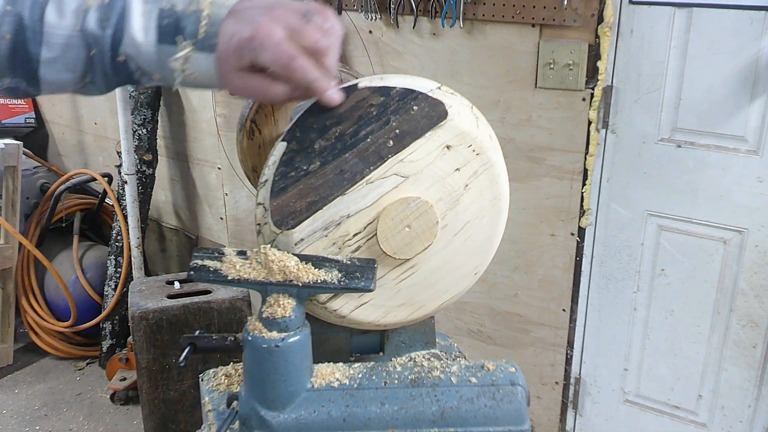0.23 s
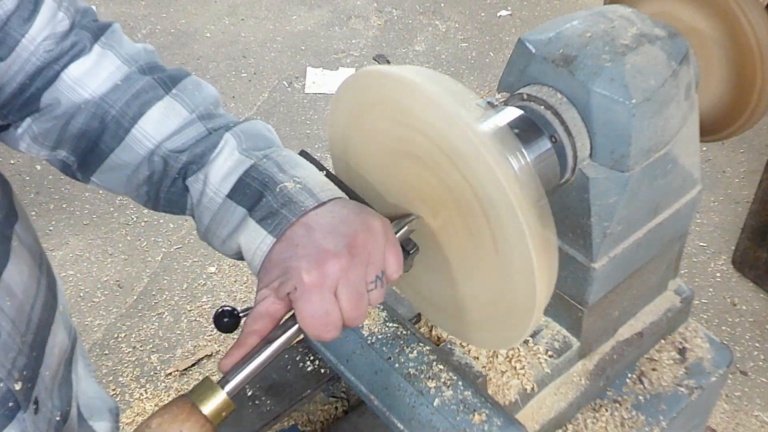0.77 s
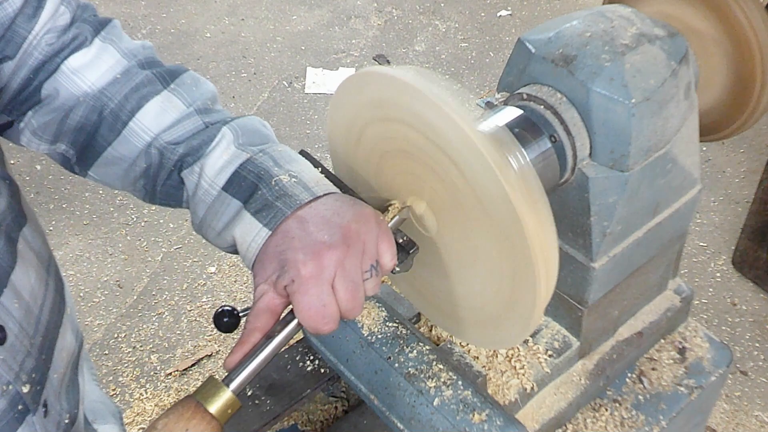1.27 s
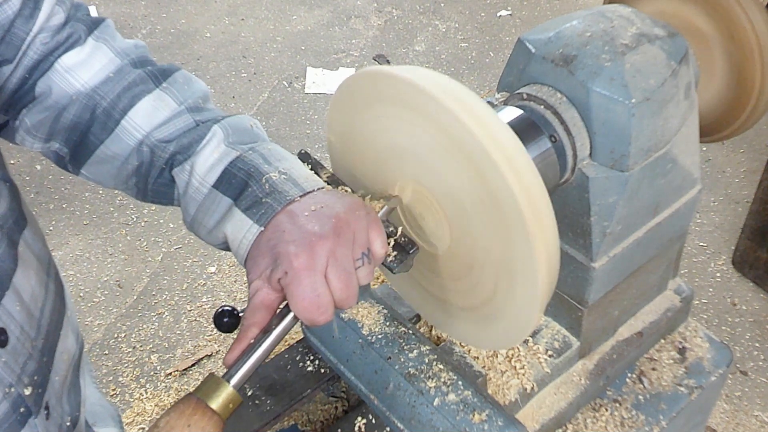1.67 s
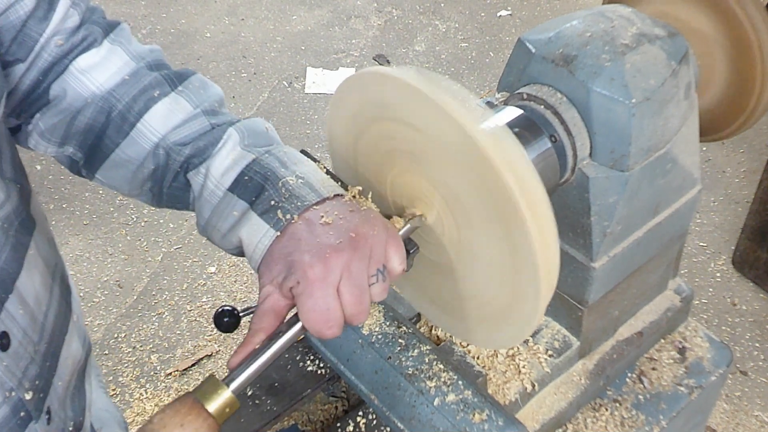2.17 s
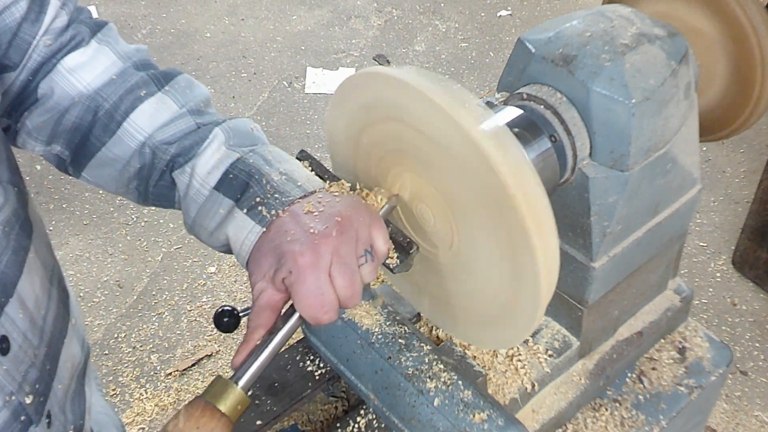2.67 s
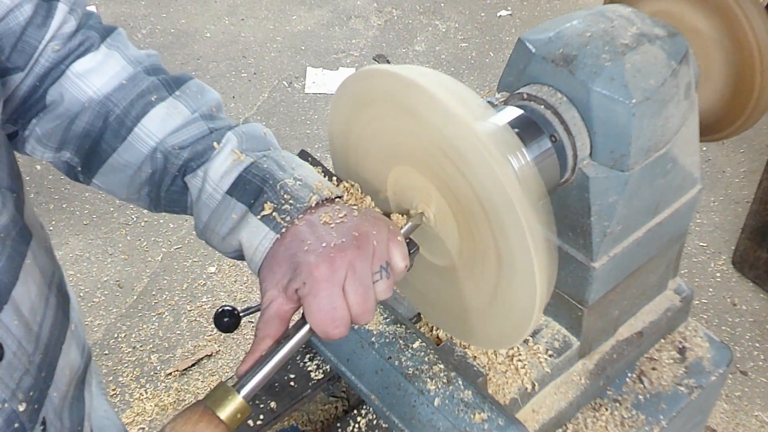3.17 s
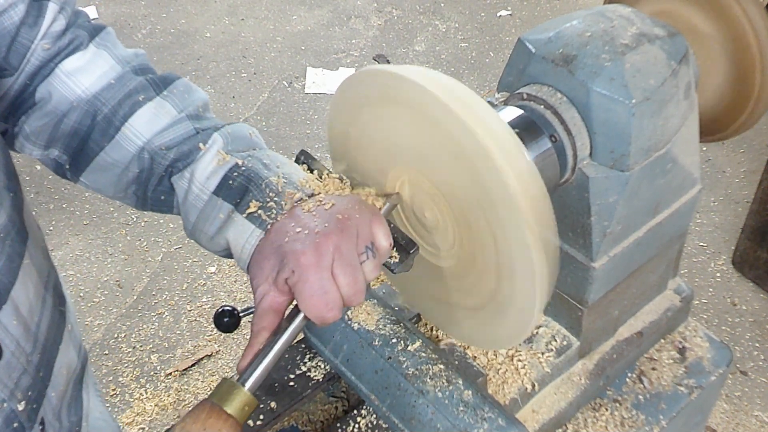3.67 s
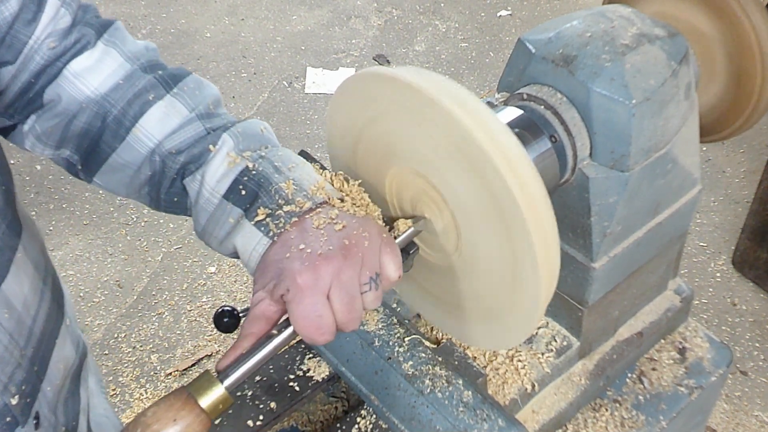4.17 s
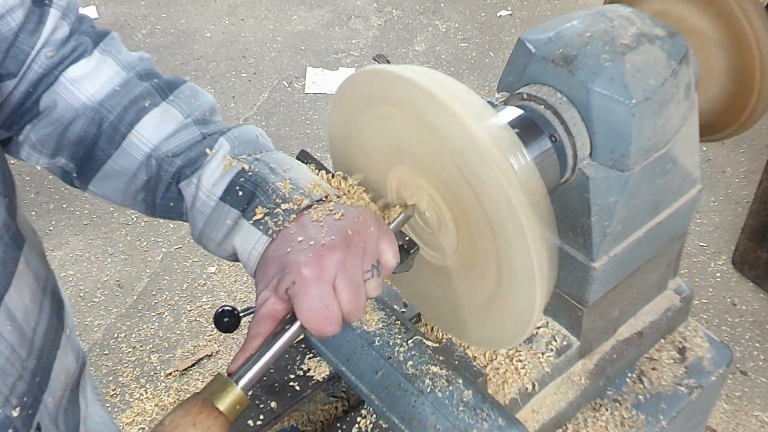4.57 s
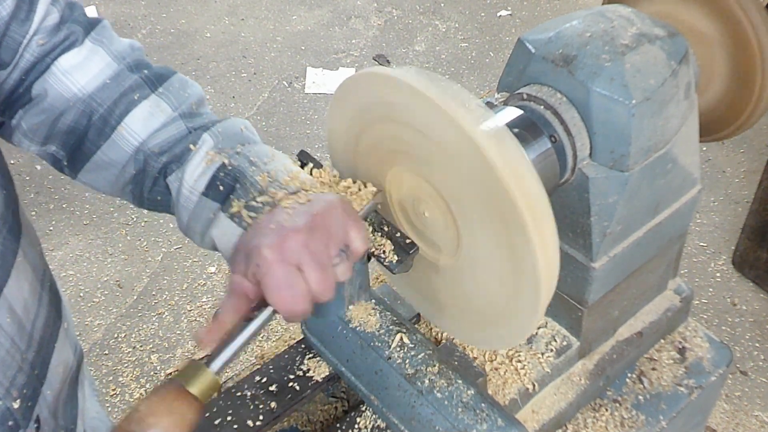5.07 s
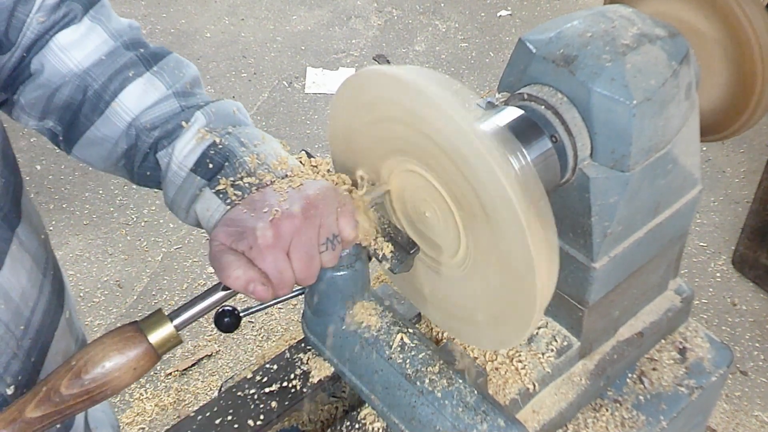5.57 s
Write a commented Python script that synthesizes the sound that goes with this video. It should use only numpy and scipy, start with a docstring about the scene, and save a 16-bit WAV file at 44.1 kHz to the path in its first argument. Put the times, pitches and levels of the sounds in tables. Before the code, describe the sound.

Faint room tone and a sleeve rustle, then a running lathe drones while a cutting tool growls, squeals and chatters against wood in bursts.

```python
"""A wood lathe at speed in a workshop: a gouge makes five passes over the face of the spinning blank,
the last opening with two brief touches. Fibres snap at random, shaking the blank and ringing the tool;
drones, knocks and scrapes join in. Filtered noise rumbles for the drive, wavering sines hum for the motor,
and close walls smear the treble. Ahead of it, cut off abruptly: the quiet shop, with room tone,
a rustling sleeve, a hand nudging the still blank and a thin whistle far down the room."""
import sys
import numpy as np
from scipy import signal
from scipy.fft import rfft, irfft
from scipy.io import wavfile
from scipy.ndimage import uniform_filter1d

SR = 44100
rng = np.random.default_rng(int(sys.argv[2]) if len(sys.argv) > 2 else 0)


def wav_out(sig):
    """Save sig, one row per channel (or a flat mono array), as 16-bit PCM at SR to the path in sys.argv[1]."""
    wavfile.write(sys.argv[1], SR, np.round(np.clip(np.atleast_2d(sig).T, -1, 1) * 32767).astype(np.int16))


N = 256220
TIME = np.arange(N) / SR  # s
LATHE_FROM_S = 0.6603
SPINDLE_HZ = 15.6

# Every spectrum below: (frequency [Hz], relative level per hertz [dB]).
# Every set of modes, the resonances on top: (centre [Hz], width [Hz], lift [dB]).
# resonances of the gouge: (centre [Hz], width [Hz], lift [dB])
TOOL_MODES = [(836, 100, 5), (876.4, 40, 5.3), (953, 44, 10.9)]
# resonances of the juddering edge: (centre [Hz], width [Hz], lift [dB])
JUDDER_MODES = [(1205, 60, 3.7), (1378, 41, 4.8), (1616, 160, 9.1), (1797, 52, 4.9)]


def amp(db):
    """Decibels to gain."""
    return np.exp(np.asarray(db) * np.log(10) / 20)


def unit(x):
    """Scales to rms 1."""
    return x / np.sqrt(np.mean(x ** 2) + 1e-20)


def sine(turns):
    """A sine of rms 1 from its running count of turns."""
    return unit(np.sin(2 * np.pi * turns))


def wander(hz):
    """Slow chance of rms 1, fading out above about hz."""
    coarse_time = np.linspace(0, TIME[-1], 4096)
    f = np.fft.rfftfreq(len(coarse_time), coarse_time[1])
    spectrum = rfft(rng.standard_normal(len(coarse_time)))
    slow = irfft(spectrum * np.exp(-(f / hz) ** 2))
    return np.interp(TIME, coarse_time, unit(slow))


def bump(s, length):
    """A smooth swell of height 1 around time s."""
    swell = np.zeros(N)
    near = slice(*np.searchsorted(TIME, [s - 2 * length, s + 2 * length]))
    swell[near] = np.exp(-2 * ((TIME[near] - s) / length) ** 2)
    return swell


def swells(rows):
    """Adds up the swells of rows (time [s], length [s], level [dB]) as gains."""
    return sum(amp(db) * bump(s, length) for s, length, db in rows)


def swells_db(rows):
    """Adds up the swells of rows (time [s], length [s], change [dB]) in decibels."""
    return sum(db * bump(s, length) for s, length, db in rows)


def body(x, spectrum, modes=(), size=8192):
    """Rings x through a causal filter of unit energy: a broad spectrum with resonances on top."""
    hz = abs(np.fft.fftfreq(size, 1 / SR))
    f, db = np.transpose(spectrum)
    db = np.interp(np.log(hz + 1), np.log(f), db)
    for centre, width, lift in modes:
        db = db + lift / (1 + (2 * (hz - centre) / width) ** 2)
    # minimum phase: the ring starts at once
    response = np.exp(np.conj(signal.hilbert(np.log(amp(db)))))
    ring = np.fft.ifft(response).real[:size // 2]
    return signal.oaconvolve(x, ring / np.linalg.norm(ring))[:N]


def snaps(per_s, spread_db):
    """Clicks of rms 1 at random times, as of breaking fibres: many small ones and a few large."""
    sizes = amp(spread_db * rng.standard_exponential(N))
    signs = np.sign(rng.random(N) - .5)
    breaks = rng.random(N) < per_s / SR
    return unit(sizes * signs * breaks)


def drone(hz, width_hz, db, waver_db=2.5):
    """A self-sustained vibration: nearly even in strength, its phase drifting at random."""
    drift = np.sqrt(2 * np.pi * width_hz / SR) * np.cumsum(rng.standard_normal(N))
    drift = uniform_filter1d(drift, size=600)
    turns = np.cumsum(hz * np.ones(N)) / SR
    return amp(db + waver_db * wander(25)) * sine(turns + drift / (2 * np.pi))


def gouge(tool_db=-3.0, scrape_db=-10.5, steel_db=-17.0, hiss_db=0.5, grain_db=1.5, uneven_db=1.1,
          bite=0.62, usual_tear_db=-21, regrip_scrape_db=2, regrip_steel_db=-9, bark_db=-5,
          catch_damping=0.87, steel_share=0.43):
    """Snapping fibres shake the blank, ring the tool, scrape and hiss."""
    # the edge digs in: (time [s], length [s], extra force [dB], then re force: judder [dB], tearing [dB])
    catches = [(1.48, 0.058, 4, 2, 0), (1.561, 0.02, 3.5, 4.5, 0), (1.606, 0.013, 1.5, 3, 0),
               (1.732, 0.011, 4.5, 6, 1), (1.803, 0.15, 3.5, -1.5, -0.5), (1.891, 0.016, 4, 7.5, 1),
               (2.63, 0.028, -1.5, 3.5, 1), (2.775, 0.035, 3.5, 0.5, 0), (3.333, 0.064, 2.5, 1.5, -1.5),
               (3.583, 0.069, 2.5, -1, -1.5), (4.58, 0.016, 2, 1.5, 1.5), (4.764, .025, 0.5, 0.5, 4),
               (4.87, 0.051, 2, -3, -3.5), (5.009, 0.011, 5, 3.5, -3), (5.37, 0.018, 1.5, -0.5, 8),
               (5.42, 0.014, 4.5, 6, 2), (5.551, 0.014, 7, 2, -1), (5.63, 0.018, 5, 5, 0),
               (5.698, 0.046, 3.5, 0, -4.5)]
    # the force of the cut changes for a moment: (time [s], length [s], change of force [dB])
    easings = [(1.695, 0.023, 0.5), (1.866, 0.0065, -2), (2.4, 0.013, -6.5), (2.574, 0.11, -2.5),
               (3.27, .016, 2), (3.42, 0.027, -1.5), (4.631, 0.0096, -1), (4.738, 0.0049, -4),
               (4.921, 0.042, -4), (5.472, 0.074, -4), (5.664, 0.0095, -0.5)]
    # the blank booms under the edge: (time [s], length [s], extra level of its lowest mode [dB])
    booms = [(1.083, 0.04, 12), (1.463, .03, 8), (1.733, 0.023, 10), (1.818, 0.028, 10), (2.21, 0.029, 13),
             (2.33, .03, 6), (3.156, 0.05, 15), (3.37, 0.035, 6), (4.485, 0.022, 1), (4.87, 0.038, 3),
             (5.55, .025, 5), (5.768, 0.028, 9.5)]
    # the blank's lowest mode, held in vibration: (frequency [Hz], line width [Hz], level re force [dB])
    blank_drone = (180.5, 16.7, -9.5)
    # the wooden blank: (frequency [Hz], level [dB]); (centre [Hz], width [Hz], lift [dB])
    blank_spectrum = [(30, -25), (85, -26), (125, -24), (165, 2), (300, -11), (520, -6.5), (700, -4),
                      (900, -6.5), (1200, -24), (2200, -53)]
    blank_modes = [(186, 52, 4.5), (264.3, 8.1, 7.7), (364, 65, 9.5), (447.3, 40, 9.2), (651, 23, 4),
                   (741, 32, 10.1)]
    # the ringing tool: (frequency [Hz], level [dB])
    tool_spectrum = [(300, -58.5), (650, -30), (800, -2.5), (950, -4.5), (1100, -20.5), (1500, -29),
                     (3000, -74)]
    # the juddering edge: (frequency [Hz], level [dB])
    judder_spectrum = [(300, -25.5), (800, -7.5), (1080, 3), (1300, 0.5), (1500, -9.5), (1800, -9.5),
                       (2000, -15), (2400, -20.5), (5000, -61)]
    # the higher bark of the edge with the handle swung out: (frequency [Hz], level [dB])
    bark_spectrum = [(1200, -25), (1560, -2), (1690, 6.5), (1830, -9), (1980, -13), (2600, -43)]
    # the scrape: (frequency [Hz], level [dB]); (centre [Hz], width [Hz], lift [dB])
    scrape_spectrum = [(1200, -19.5), (2150, -8), (2600, 5.5), (2950, 7.5), (3150, 3.5), (3500, -6.5),
                       (3950, -8), (4200, -21.5), (5300, -34.5), (9000, -66.5)]
    scrape_modes = [(2700, 50, 3), (3070, 95, 0.9), (3860, 170, 5.2)]
    # the singing steel: (frequency [Hz], level [dB]); (centre [Hz], width [Hz], lift [dB])
    steel_spectrum = [(2000, -44.5), (3100, -10), (3300, 3), (3480, 1.5), (3600, -22), (3740, -10),
                      (4200, -25.5), (7000, -42)]
    steel_modes = [(3357, 43, 11), (3456, 58, 8.4), (3690, 95, 8.9), (3660, 90, 2.8)]
    # the hiss of tearing: (frequency [Hz], level [dB]); (centre [Hz], width [Hz], lift [dB])
    hiss_spectrum = [(1500, -18.5), (3200, 3), (4000, 3.5), (4600, -3.5), (5400, -7), (6000, -1), (6800, 2),
                     (7600, 0), (8300, -13), (9000, -15)]
    hiss_modes = [(4240, 110, 5), (4930, 290, 5.5), (5430, 370, -3), (6260, 51, 3.5), (6600, 90, 3.5),
                  (6950, 120, 2.5)]

    push, song, song_hz, ring, judder, tear = pass_controls()
    # catches, easings and uneven wood change the force
    dig, dig_judder, dig_tear = sum(np.outer(extra_db, bump(s, length))
                                    for s, length, *extra_db in catches)
    ease = swells_db(easings)
    force = amp(dig + ease + uneven_db * wander(68))
    push, song = push * force, song * force
    # a catch damps the ring; a light cut still tears
    shake = chatter() - catch_damping * dig
    judder = judder + dig_judder
    tear = tear + dig_tear - ease
    # the edge meets end grain twice in every turn
    half_turns = np.cumsum(2 * SPINDLE_HZ * (1 + 0.0028 * wander(1.1))) / SR
    end_grain = np.exp(3 * np.cos(2 * np.pi * half_turns))
    grain = grain_db * unit(end_grain - end_grain.mean())
    # with the handle swung out, the edge barks and scrapes more and the steel sings less
    swung = TIME > 5.15
    sharpness = bite * (tear - usual_tear_db) + grain / 2

    def cut(db, spectrum, modes):
        """Fibres break under the push and ring one part."""
        return body(push * amp(db) * snaps(per_s=8000, spread_db=1.9), spectrum, modes)

    blank = cut(0, blank_spectrum, blank_modes)
    blank += push * amp(swells_db(booms)) * drone(*blank_drone)
    tool = cut(tool_db + ring + shake, tool_spectrum, TOOL_MODES)
    tool += song * drone(song_hz, width_hz=10.27, db=shake)
    rasp = cut(judder - regrip_scrape_db * swung / 2, judder_spectrum, JUDDER_MODES)
    bark = swung * cut(bark_db + judder, bark_spectrum, [])
    scrape = cut(scrape_db + sharpness + regrip_scrape_db * swung, scrape_spectrum, scrape_modes)
    steel_level = steel_db + sharpness + steel_share * shake + regrip_steel_db * swung
    steel = cut(steel_level, steel_spectrum, steel_modes)
    hiss = cut(hiss_db + tear + grain, hiss_spectrum, hiss_modes)
    return blank + tool + rasp + bark + scrape + steel + hiss


def pass_controls(song_peak=0.22, song_drop_db=2.5, song_power=0.47, song_flat_hz=12,
                  shallow_tear_db=18, shallow_judder_db=7, shallow_ring_db=7.5):
    """The edge sinks in, settles and is withdrawn: push and song (gains), pitch (Hz), the rest in dB."""
    # one row a stroke of the gouge, before catches and chatter: (start [s], end [s], settling time [s],
    # deepening time [s], withdrawal [s], cutting force [dB], then re force: tool ring [dB],
    # edge judder [dB], fibre tearing [dB], tool song [dB]; pitch the song settles towards [Hz])
    passes = [(0.91, 1.912, 0.051, 0.557, 0.017, -39.5, 4, 0.5, -13, -4.5, 824),
              (2.15, 2.812, 0.087, 0.392, 0.015, -32.5, 1.5, -1.5, -17, -5, 829.5),
              (3.06, 3.812, 0.16, 0.332, 0.1, -32, 1.5, -2.5, -18.5, -7, 827),
              (4.338, 5.032, 0.12, 0.278, 0.042, -31, -2, -3, -19, -6, 829),
              (5.231, 5.269, 0.0034, 0.0064, 0.011, -36, -3, -3.5, -27, -5, 882),
              (5.284, 5.321, .003, 0.012, 0.018, -36.5, -13, 1, -30, -12, 880),
              (5.318, 5.875, 0.01, 0.0029, 0.06, -32, 0, -3.5, -21, -11, 885)]
    push, song, song_hz, ring, judder, tear = np.zeros((6, N))
    for (start, end, settle, deepen, withdraw, force_db,
         ring_db, judder_db, tear_db, song_db, hz) in passes:
        on = (TIME > start) & (TIME < end)
        t, length = TIME[on] - start, end - start
        depth = 1 - np.exp(-t / settle)
        held = np.minimum((length - t) / withdraw, 1)
        push[on] = amp(force_db) * depth * held
        # the tool sings from the lightest touch, a little flat at first and most early in a pass
        shallow = np.exp(-t / deepen)
        song_drop = song_drop_db * (2 * (t / length - song_peak)) ** 2
        song[on] = amp(force_db + song_db - song_drop) * depth ** song_power * held
        song_hz[on] = hz - song_flat_hz * shallow
        # a shallow cut rings, judders and tears less
        ring[on] = ring_db - shallow_ring_db * shallow
        judder[on] = judder_db - shallow_judder_db * shallow
        tear[on] = tear_db - shallow_tear_db * shallow
    return push, song, song_hz, ring, judder, tear


def chatter(rise_s=0.0043):
    """Extra ring in dB as the tool chatters on its rest: each bout sets in fast and dies away."""
    # bouts of chatter: (time [s], decay [s], extra ring [dB])
    bouts = [(0.97, .2, 1.5), (1.235, .03, 6), (1.271, 0.016, 10), (1.53, 0.069, 9), (1.88, .03, 6),
             (2.321, 0.025, 9), (2.363, .02, 7.5), (2.415, 0.026, 8), (2.465, .02, 8.5), (2.515, 0.026, 11),
             (2.608, .03, 7), (3.306, 0.02, 10), (3.345, 0.028, 10.5), (3.49, .04, 8), (4.385, .05, 4.5),
             (4.5, 0.051, 4), (4.645, 0.076, 11.5), (4.739, .016, 15), (4.79, .03, 9.5), (4.85, 0.034, 0.5),
             (4.895, 0.016, 11), (5.58, .02, 2), (5.73, .1, 5)]
    extra = np.zeros(N)
    for s, decay, db in bouts:
        t = np.maximum(TIME - s, 0)
        extra += db * np.minimum(t / rise_s, 1) * np.exp(-t / decay)
    return extra


def knocks(decay_s=0.0044):
    """The edge strikes the blank: a short crunch rings wood and tool together."""
    # strikes: (time [s], level [dB])
    strikes = [(1.281, -34), (1.483, -31), (1.809, -30), (1.895, -29), (2.414, -28), (2.471, -28),
               (2.757, -24), (2.796, -25), (3.49, -28), (3.587, -20.5), (4.741, -24), (4.831, -29),
               (5.234, -29), (5.29, -31.5), (5.57, -19.5), (5.679, -21)]
    # colour of a strike: (frequency [Hz], level [dB])
    strike_spectrum = [(60, -23.5), (170, -2), (500, 1), (900, -6.5), (1250, -4), (1600, -20.5),
                       (2200, -19), (2900, -16.5), (4500, -32), (8000, -46.5)]
    blows = np.zeros(N)
    for s, db in strikes:
        blows += amp(db) * (TIME >= s) * np.exp(-np.maximum(TIME - s, 0) / decay_s)
    crunch = blows * snaps(per_s=8900, spread_db=0.5)
    return body(crunch, strike_spectrum, TOOL_MODES + JUDDER_MODES)


def shavings():
    """The last shaving scrapes off as the edge lifts: a short swell of snapping fibres."""
    # trailing scrapes: (time [s], length [s], level [dB])
    scrapes = [(1.917, .012, -49), (2.823, 0.024, -40), (3.803, 0.035, -42)]
    # colour of the shaving: (frequency [Hz], level [dB])
    shaving_spectrum = [(200, 0), (850, 3.5), (1400, -6), (2100, -15), (2900, -9), (4200, -21),
                        (5400, -35.5), (7000, -28.5), (9000, -42)]
    return body(snaps(per_s=4800, spread_db=1.0) * swells(scrapes), shaving_spectrum)


def walls(x, wet_db=-9, t60=0.05, above_hz=2500):
    """Dense random reflections from the near walls smear the treble of the cut."""
    t = TIME[:SR // 2]
    echoes = rng.standard_normal(len(t)) * (rng.random(len(t)) < 2000 / SR)
    tail = echoes * (t > .004) * amp(-60 * t / t60)
    high_pass = signal.butter(2, above_hz, "high", fs=SR, output="sos")
    tail = signal.sosfilt(high_pass, tail / np.linalg.norm(tail))
    return x + amp(wet_db) * signal.oaconvolve(x, tail)[:N]


def lathe(drive_db=-40, throb_db=1.25, hum_waver_db=-0.7, hum_dip_db=2,
          swing_idle=0.16, swing_load=1.1, swing_hz=9):
    """Belt and bearings rumble, throbbing twice a turn; the motor's hum sinks and wavers under load."""
    # rumble of the drive: (frequency [Hz], level [dB]); (centre [Hz], width [Hz], lift [dB])
    drive_spectrum = [(25, -25.5), (70, -11.5), (110, -1), (300, 3.5), (420, -3.5), (750, 0.5),
                      (1000, -2.5), (1250, -9.5), (1400, -13), (2150, -20.5), (2850, -10.5), (3600, -28),
                      (5200, -43), (6600, -35), (8500, -50.5)]
    drive_modes = [(95, 12, 6), (170, 41, 5.5), (326, 12, 4.7), (455, 38, 6.2), (586, 17, 5.4),
                   (654, 20, 7.9), (828, 38, 3.1), (1650, 160, 13)]
    # magnetic hum of the motor: (frequency [Hz], rms level at idle before wavering [dB])
    hum_lines = [(119.8, -46.5), (239.4, -45)]
    throb = throb_db * np.sin(2 * np.pi * 2 * SPINDLE_HZ * TIME)
    rumble = body(rng.standard_normal(N) * amp(drive_db + throb), drive_spectrum, drive_modes)
    push = uniform_filter1d(pass_controls()[0], size=4000)
    load = push / push.max()  # 1 at the heaviest cut
    swing = swing_idle + swing_load * load  # rad
    motor_time = TIME + .0003 * wander(3)
    hum = np.zeros(N)
    for hz, db in hum_lines:
        level = db - hum_dip_db * load + hum_waver_db * wander(7.9)
        turns = hz * motor_time + swing * wander(swing_hz) / (2 * np.pi)
        hum += amp(level) * sine(turns)
    return rumble + hum


def quiet_shop(air_db=-60):
    """Room tone and faint steady tones, with cloth brushing and a hand nudging the still blank."""
    # room tone: (frequency [Hz], level [dB]); (centre [Hz], width [Hz], lift [dB])
    air_spectrum = [(20, -19), (60, 0), (160, -2.5), (250, -5.5), (500, -15), (1000, -14.5), (1500, -22.5),
                    (2700, -26), (4000, -33.5), (5200, -41), (6800, -32), (9000, -45)]
    air_modes = [(155, 27, 7.2), (446, 25, 10), (493, 16, 5), (700, 15, 7), (820, 36, 6.1),
                 (2700, 160, 4.7)]
    # faint steady tones in the shop: (frequency [Hz], rms level [dB])
    steady_tones = [(60, -70), (298, -71), (596, -73.5)]
    # sleeve and hand brushing: (time [s], length [s], level [dB])
    rustles = [(.122, 0.04, -60), (0.189, 0.019, -58), (0.326, 0.053, -60.5), (0.522, 0.04, -60.5)]
    # colour of the cloth: (frequency [Hz], level [dB])
    cloth_spectrum = [(100, 18), (800, 2.5), (1600, -2), (3200, -6), (5000, -15), (7200, -6), (9000, -27)]
    # soft knocks of the hand on the still blank: (time [s], length [s], level [dB])
    nudges = [(0.295, 0.11, -57.5), (0.38, 0.051, -54), (0.48, 0.011, -54)]
    # colour of those knocks: (frequency [Hz], level [dB])
    thud_spectrum = [(30, -10), (80, -13), (160, 25), (230, -19), (600, -48)]
    air = amp(air_db) * body(rng.standard_normal(N), air_spectrum, air_modes)
    tones = sum(amp(db) * sine(hz * TIME) for hz, db in steady_tones)
    cloth = body(snaps(per_s=5900, spread_db=0.5), cloth_spectrum) * swells(rustles)
    hand = body(rng.standard_normal(N), thud_spectrum) * swells(nudges)
    return air + tones + cloth + hand


def whistle():
    """A thin, unsteady tone far down in the room: one sine of wandering pitch."""
    # course of the whistle: (time [s], frequency [Hz], rms level [dB])
    course = [(0, 2560, -77), (.07, 2540, -80), (.14, 2630, -80), (.18, 2740, -90), (.23, 2790, -82),
              (.33, 2820, -86), (.37, 2900, -96)]
    s, hz, db = np.transpose(course)
    turns = np.cumsum(np.interp(TIME, s, hz) + 25 * wander(59)) / SR
    return amp(np.interp(TIME, s, db)) * sine(turns)


def scene():
    """The still shop gives way at once to the running lathe."""
    running = lathe() + walls(gouge() + knocks() + shavings())
    still = quiet_shop() + whistle()
    return np.where(TIME >= LATHE_FROM_S, running, still)[None]


def record(dry, click_db=-33, edge_hz=8650, click_edge_hz=16000):
    """The recorder's steep band limit, with soft ends; a thin, brighter click where the lathe comes in."""
    def low_pass(x, hz):
        """A steep cut of the treble."""
        taps = signal.firwin(301, hz, window=("kaiser", 8), fs=SR)
        return signal.oaconvolve(x, taps[None], "same")

    ends = signal.windows.tukey(N, .001)
    click = amp(click_db) * (np.arange(N) == round(LATHE_FROM_S * SR))
    return low_pass(low_pass(dry * ends, edge_hz) + click, click_edge_hz)


dry = scene()
out = record(dry)
wav_out(out)
```